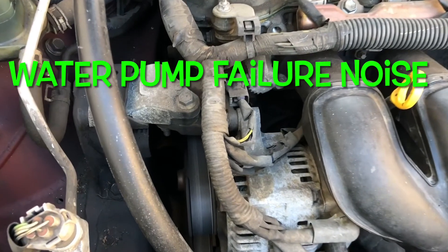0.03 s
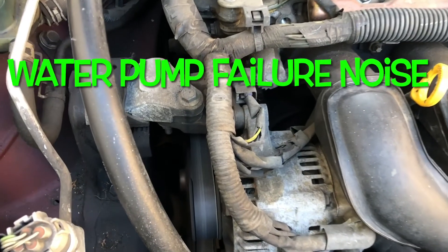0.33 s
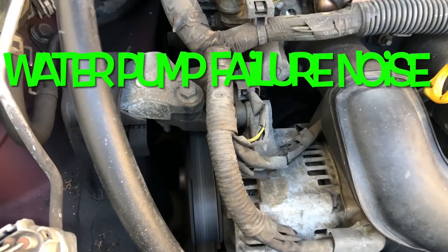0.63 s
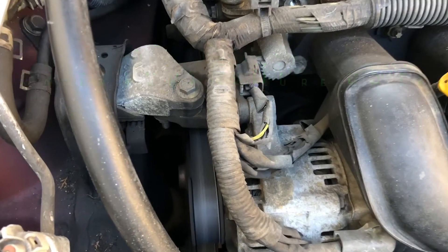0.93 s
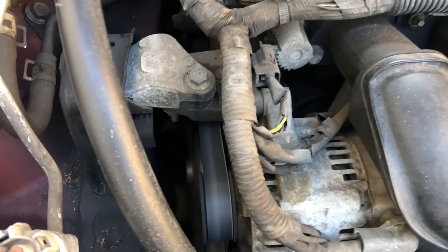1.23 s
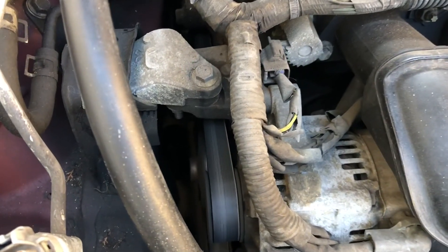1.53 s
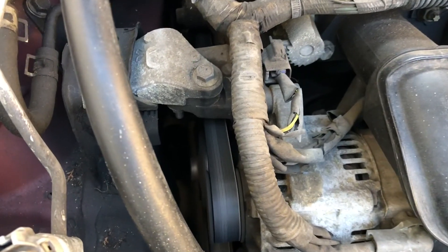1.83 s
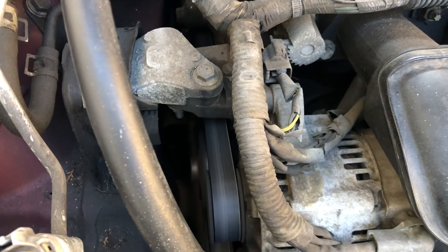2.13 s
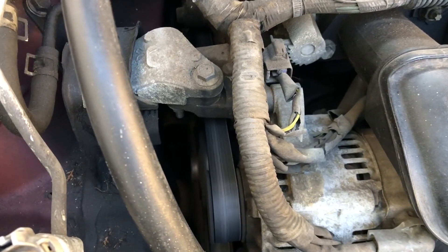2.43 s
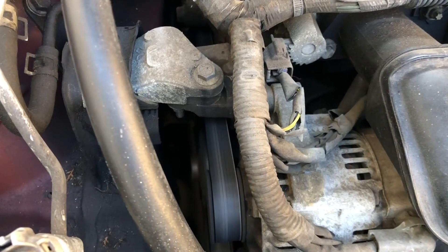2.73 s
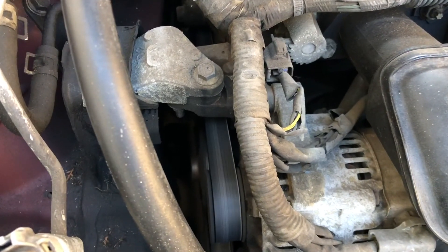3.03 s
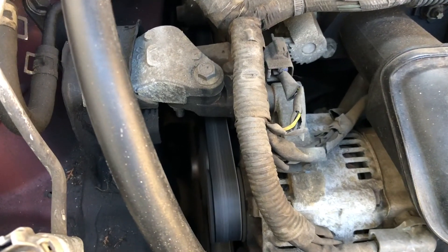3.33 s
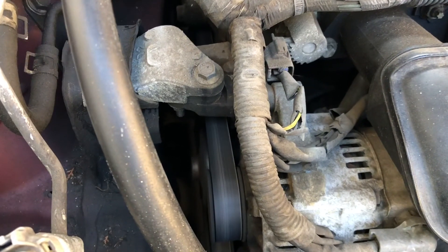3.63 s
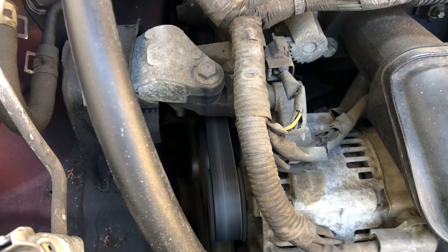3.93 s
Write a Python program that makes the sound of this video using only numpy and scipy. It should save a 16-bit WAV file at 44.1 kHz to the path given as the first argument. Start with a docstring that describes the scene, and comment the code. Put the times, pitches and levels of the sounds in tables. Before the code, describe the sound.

A failing water pump squeals for the whole four seconds, high, ragged and fluttering with the idle, heard close above an open car engine bay. It catches about six times a second with tiny rasps and dips in pitch, while its dry bearing grinds in uneven swells. The engine drones low underneath with faint valve ticking. Around 1.5 seconds the sound briefly grows louder, then carries on as before.

```python
"""A failing water pump squeals without a break, heard from just above the belt of an idling car engine.
The stick-slip squeal flicks up in pitch with every firing; about once an engine cycle the pump
catches, rasps and sags. Its dry bearing grinds in slow swells through the pump housing. Underneath,
valves tick faintly over a low drone. The metal of the open engine bay smears the squeal."""
import sys
import numpy as np
from scipy import signal
from scipy.fft import rfft, irfft, next_fast_len
from scipy.io import wavfile
from scipy.ndimage import uniform_filter1d, minimum_filter1d, map_coordinates

SR = 44100
rng = np.random.default_rng(int(sys.argv[2]) if len(sys.argv) > 2 else 0)


def transcribe(u):
    """Save the signal u as a 16-bit wav file named by the first command-line argument.

    u: samples, shape (n,) or (channels, n), limited to [-1, 1]; the rate is SR.
    q: integer samples, one column per channel.
    """
    v = np.clip(np.atleast_2d(u).T, -1, 1)
    q = np.round(v * 32767).astype(np.int16)
    wavfile.write(sys.argv[1], SR, q)


N = 176400

# Hum of the engine and belt drive: pitch_hz, level_db
DRONE_PARTIALS = [(53.8, -48.5), (79, -58), (107.7, -54), (158, -56.5), (186, -63), (212, -52.5),
                  (244, -43), (268, -51.5), (320, -50.5), (502, -49.5), (686, -40.5), (1534, -51)]
# Colour of the engine's rush: frequency_hz, gain_db
RUSH_EQ = [(20, -27), (38, -24), (65, -6), (130, -10.5), (250, -3), (600, 2), (1200, 3.5), (2200, 2),
           (3000, -3), (5000, -6.5), (9000, -16), (16000, -44)]
# Colour of a valve tick: frequency_hz, gain_db
TICK_EQ = [(500, -5), (1500, -9), (4000, 1), (8000, 3), (15000, -22)]
# Swells of the dry bearing: time_s, level_db
GRIND_SWELLS = [(0, -20.5), (.05, -24.5), (.09, -20.5), (.33, -19), (.38, -24.5), (.45, -21.5), (.7, -24.5),
                (.85, -23), (.97, -19), (1.04, -28.5), (1.09, -16), (1.2, -18.5), (1.35, -22),
                (1.45, -17.5), (1.58, -20), (1.68, -24), (1.75, -18.5), (1.81, -23.5), (1.95, -17.5),
                (2.05, -22.5), (2.18, -23), (2.22, -20.5), (2.46, -19.5), (2.51, -24), (2.58, -21),
                (2.83, -25), (3.1, -19.5), (3.18, -26.5), (3.22, -16), (3.33, -19), (3.45, -21),
                (3.58, -21), (3.64, -25.5), (4, -22.5)]
# Resonances of the pump housing: pitch_hz, width_hz, gain_db
HOUSING_MODES = [(369, 12.3, -9.5), (486.3, 17.4, -1.5), (573.4, 24, -6), (684.2, 33.4, 0), (766, 54, -5),
                 (870, 34, -3), (1002, 30, -1), (1095, 62, -2), (1160, 27.5, 2), (1217, 21, -0.5),
                 (1330, 85, -5), (1463, 51, 1), (1542.5, 35, 5), (1617, 38, 0), (1686, 61, 0),
                 (1950, 79, -7), (2170, 80, -11)]
# Colour of the dry rubbing: frequency_hz, gain_db
RUB_EQ = [(1500, -19), (2500, -12), (3400, -5), (4000, -6), (4450, 1.5), (4530, -16.5), (4630, 8),
          (4750, 0), (5100, 5), (5900, 7), (6250, -1.5), (6420, 6), (6600, -2.5), (6760, 3), (6980, -5),
          (7600, -6), (8600, -12.5), (9800, -9), (10600, -13), (11300, -10), (13000, -22), (16000, -27)]
# Moments when the pump catches: time_s, relative_rasp_db, sag_hz
PUMP_CATCHES = [(0.01, -24, 202), (0.181, -25, 70), (0.354, -24, 241.5), (.397, -30, 340),
                (.52, -22.5, 88.5), (.565, -32, 332), (0.691, -25, 38), (.735, -28, 159),
                (0.857, -20, 71.5), (1.03, -18.5, 39.5), (1.199, -19.5, 12), (1.378, -20.5, 95),
                (1.42, -21, 125.5), (1.463, -21, 48), (1.553, -23, 2), (1.636, -19.5, 202),
                (1.682, -22.5, 25), (1.724, -25, 20), (1.804, -18, 257), (1.977, -18.5, 202),
                (2.06, -22.5, 163.5), (2.144, -22, 220.5), (2.315, -26, 74.5), (2.485, -22, 235),
                (2.53, -30, 339.5), (2.652, -21, 95), (2.698, -33, 333.5), (2.822, -26, 50),
                (2.868, -28, 163.5), (2.992, -19, 64.5), (3.162, -19.5, 38.5), (3.331, -18, -8),
                (3.511, -21, 102), (3.555, -22, 132), (3.678, -20, 279), (3.861, -21, 50),
                (3.903, -25, 340)]
# Resting pitch of the squeal: time_s, pitch_hz
SQUEAL_PITCH = [(0, 5434), (.2, 5473), (.4, 5456), (.7, 5480), (1.1, 5500), (1.4, 5504), (1.7, 5530),
                (2.0, 5486), (2.2, 5450), (2.55, 5457), (2.85, 5485), (3.25, 5505), (3.6, 5516), (4, 5525)]
# Typical upward flick of the squeal at each firing: time_s, rise_hz
FLICK_DEPTH = [(0, 152.4), (.38, 150), (.47, 332), (.8, 330), (1.3, 261.4), (1.55, 90.4), (1.85, 100.5),
               (2.05, 229.1), (2.5, 149), (2.6, 329.3), (2.95, 330), (3.45, 250), (4, 240)]
# Moments when the squeal falters: time_s, dip_db
SQUEAL_DIPS = [(.24, 8), (.403, 2), (0.747, 10), (.9, 3), (1.519, 7), (1.592, 7), (1.91, 6), (1.957, 7),
               (1.99, 9), (2.037, 6), (2.078, 6), (2.372, 7), (2.881, 7), (3.032, 5), (3.84, 5)]
# Resonances of the pulley: pitch_hz, width_hz, gain_db
PULLEY_MODES = [(4450, 55, 5.5), (4960, 106, -4.5), (5138, 99, -2), (5398, 58, -2.5), (5478, 69, 1),
                (5560, 91, 0), (5650, 126, -2.5), (5858, 73, -2.5), (5912, 72, -3), (6100, 75, -8.5),
                (6210, 66, -4), (6850, 77, 9)]
# How the squeal's octave radiates: frequency_hz, gain_db
OCTAVE_EQ = [(9000, -6), (9900, 11), (10250, -3), (10550, 6.5), (10900, -5), (11250, -6), (11450, -23),
             (12000, -24), (13000, -18)]

FIRING_HZ, FIRING_AT_S, PUMP_TURNS_PER_FIRING = 23.44, 2.992, .75
RUSH_DB, DRONE_WAVER_DB, DRONE_DRIFT_HZ = -30, 2.5, 1.31
TICK_DB, TICK_SCATTER_DB, TICK_DECAY_S = -35.5, 2, .0022
GRIND_REST_DB, GRIND_TRIM_DB, GRIND_FLUTTER_DB, GRIND_SPLIT_HZ = -21.5, -.19, 1.5, 940
RUB_DB, RUB_PULSE_DB, RUB_CHATTER_DB, RUB_GRAINS_PER_S = -21.5, .5, 1.4, 12000
CATCH_RISE_S, CATCH_FALL_S, SAG_S, RASP_BOOST_DB, RASP_TOP_HZ = .0041, .0098, .007, 7.5, 9100
FLICK_SCATTER, WANDER_HZ, JITTER_HZ, JITTER_PER_S = .35, 30, 105, 560
STRAND_HZ, STRAND_JITTER_HZ, STRAND_DB = 5830, 150, -8.5
STUTTER_HZ, STUTTER_SPREAD, STUTTER_DB, CHATTER_DB = 188.6, .3, 5, 3.2
SLIP_RADIANS, SATURATE_S, SATURATE_KNEE = .75, .022, .7
SQUEAL_DB, TURN_DB, FALTER_S, OCTAVE_DB, OCTAVE_CHATTER_DB = -10.5, .6, .0065, -27.5, 3
RISE_AT_S, RISE_S, RISE_HIGH_DB, RISE_LOW_DB = 1.464, .061, 3, 6


def amp(db):
    """Decibels to gain."""
    return 10 ** (np.asarray(db) / 20)


def unit(x):
    """Scale to rms 1."""
    return x / np.sqrt(np.mean(x ** 2) + 1e-20)


def clock():
    """Seconds at each sample."""
    return np.arange(N) / SR


def curve(rows):
    """An automation line through (time_s, value) rows."""
    return np.interp(clock(), *np.transpose(rows))


def wobble(per_s):
    """Smooth random modulation, per_s knots a second."""
    return map_coordinates(rng.standard_normal(int(N * per_s / SR) + 4), [clock() * per_s])


def filtered(x, response):
    """Filter x by a gain given as a function of frequency."""
    size = next_fast_len(N + SR // 4)
    return irfft(rfft(x, size) * response(np.fft.rfftfreq(size, 1 / SR)), size)[:N]


def coloured(x, eq):
    """Shape x with an EQ curve, at rms 1."""
    points_hz, db = np.transpose(eq)
    return unit(filtered(x, lambda hz: amp(np.interp(np.log(hz + 1), np.log(points_hz), db))))


def ring(x, modes):
    """Play x through resonances of alternating polarity, at rms 1."""
    def response(hz):
        return sum((-1) ** k * amp(db) * 1j * hz * width / (pitch ** 2 - hz ** 2 + 1j * hz * width)
                   for k, (pitch, width, db) in enumerate(modes))
    return unit(filtered(x, response))


def grains(per_s):
    """Tiny impacts of random size at random moments."""
    return rng.standard_normal(N) * (rng.random(N) < per_s / SR)


def firing_angle():
    """Radians, one turn for each firing."""
    return 2 * np.pi * FIRING_HZ * (clock() - FIRING_AT_S)


def engine_bay(x, t60_s=.04, wet_db=-8):
    """Close metal surfaces add a dense, very short echo."""
    t = np.arange(SR // 10) / SR
    tail = rng.standard_normal(len(t)) * amp(-60 * t / t60_s) * (t > .001)
    echo = unit(signal.fftconvolve(x, tail)[:N])
    return unit(unit(x) + amp(wet_db) * echo)


def engine_drone():
    """The bed: engine and belt drive hum in wavering partials inside a broad rush."""
    hum = np.zeros(N)
    for hz, db in DRONE_PARTIALS:
        level = amp(db + DRONE_WAVER_DB * wobble(12))
        hum += level * np.sin(2 * np.pi * np.cumsum(hz + DRONE_DRIFT_HZ * wobble(10)) / SR)
    return np.sqrt(2) * hum + amp(RUSH_DB) * coloured(rng.standard_normal(N), RUSH_EQ)


def valve_ticks():
    """The valves tap twice for each firing, faint and uneven."""
    beats = 2 * FIRING_HZ * clock()
    strengths = amp(TICK_DB + TICK_SCATTER_DB * rng.standard_normal(int(beats[-1]) + 1))
    age_s = (beats % 1) / (2 * FIRING_HZ)
    envelope = strengths[beats.astype(int)] * np.exp(-age_s / TICK_DECAY_S)
    return envelope * coloured(rng.standard_normal(N), TICK_EQ)


def bearing_grind(low_share=.39):
    """Rough contacts ring the housing; the lows follow only a share of each swell, so it brightens."""
    contacts = grains(per_s=9000) * amp(GRIND_FLUTTER_DB * wobble(55))
    body = ring(contacts, HOUSING_MODES)
    lows = filtered(body, lambda hz: 1 / (1 + (hz / GRIND_SPLIT_HZ) ** 6))
    swell_db = curve(GRIND_SWELLS) - GRIND_REST_DB
    swelling = amp(low_share * swell_db) * lows + amp(swell_db) * (body - lows)
    return amp(GRIND_REST_DB + GRIND_TRIM_DB) * swelling


def pump_rasp():
    """Gritty rubbing pulses with the firings; a duller scrape flares at each catch."""
    t = clock()
    flare = sum(amp(db) * np.exp(-np.maximum((s - t) / CATCH_RISE_S, (t - s) / CATCH_FALL_S) ** 2)
                for s, db, _ in PUMP_CATCHES)
    grit = coloured(grains(RUB_GRAINS_PER_S), RUB_EQ)
    scrape = filtered(grit, lambda hz: 1 / np.sqrt(1 + (hz / RASP_TOP_HZ) ** 4))
    rub_db = RUB_DB + RUB_PULSE_DB * np.cos(firing_angle() - 1) + RUB_CHATTER_DB * wobble(300)
    rub = amp(rub_db) * coloured(grains(RUB_GRAINS_PER_S), RUB_EQ)
    return amp(RASP_BOOST_DB) * flare * scrape + rub


def squeal_pitch(lead_radians=1.59):
    """The squeal's pitch in Hz: it flicks up just ahead of each firing, sags at catches and jitters."""
    sag = sum(hz * np.exp(-((clock() - s) / SAG_S) ** 2) for s, _, hz in PUMP_CATCHES)
    pulse = ((1 + np.cos(firing_angle() + lead_radians)) / 2) ** 2
    flick = curve(FLICK_DEPTH) * (1 + FLICK_SCATTER * wobble(23)) * pulse
    return curve(SQUEAL_PITCH) + flick - sag + WANDER_HZ * wobble(70) + JITTER_HZ * wobble(JITTER_PER_S)


def upper_strand():
    """A higher slip tone beats against the squeal, strongest while the pitch flicks most."""
    phase = 2 * np.pi * np.cumsum(STRAND_HZ + STRAND_JITTER_HZ * wobble(JITTER_PER_S)) / SR
    return amp(STRAND_DB) * unit(curve(FLICK_DEPTH)) * np.sin(phase)


def pump_squeal():
    """The lead: a ragged stick-slip tone sweeps the pulley's modes, which ring on and beat."""
    phase = 2 * np.pi * np.cumsum(squeal_pitch()) / SR + SLIP_RADIANS * wobble(520)
    stutter = np.sin(2 * np.pi * np.cumsum(STUTTER_HZ * (1 + STUTTER_SPREAD * wobble(120))) / SR)
    bursts = amp(STUTTER_DB * stutter + CHATTER_DB * wobble(330))
    tone = engine_bay(ring(bursts * (np.sin(phase) + upper_strand()), PULLEY_MODES))
    # Friction caps the tone's strength, like a compressor.
    power = np.abs(uniform_filter1d(tone ** 2, int(SATURATE_S * SR)))
    capped = unit(tone / np.sqrt(power + SATURATE_KNEE))
    octave = amp(OCTAVE_CHATTER_DB * wobble(140)) * np.sin(2 * phase)
    sheen = amp(OCTAVE_DB) * coloured(engine_bay(octave), OCTAVE_EQ)
    dip_db = sum(db * np.exp(-((clock() - s) / FALTER_S) ** 2) for s, db in SQUEAL_DIPS)
    # The pump rubs hardest at one spot in each turn.
    turn_db = TURN_DB * np.cos(PUMP_TURNS_PER_FIRING * firing_angle() + 2.9)
    return amp(SQUEAL_DB + turn_db - dip_db) * (capped + sheen)


def scene():
    """The mono mix of pump and engine; all but the grind rides one brief rise in level."""
    rise = np.exp(-((clock() - RISE_AT_S) / RISE_S) ** 4)
    highs = amp(RISE_HIGH_DB * rise) * (pump_squeal() + pump_rasp() + valve_ticks())
    bed = amp(RISE_LOW_DB * rise) * engine_drone()
    return (highs + bed + bearing_grind())[None]


def record(dry, ceiling=1, limiter_s=.0025, top_hz=15900):
    """A fast limiter holds the peaks, then a brick-wall low-pass trims the top."""
    window = int(limiter_s * SR)
    needed_gain = np.minimum(1, ceiling / (np.abs(dry[0]) + 1e-9))
    gain = uniform_filter1d(minimum_filter1d(needed_gain, window), window)
    return filtered(dry[0] * gain, lambda hz: hz < top_hz)[None]


dry = scene()
out = record(dry)
transcribe(out)
```